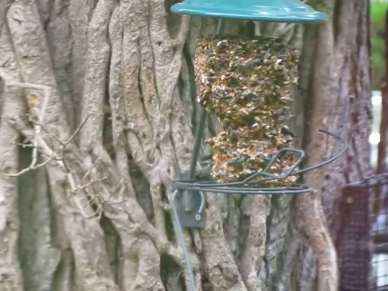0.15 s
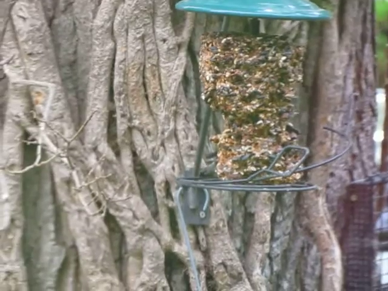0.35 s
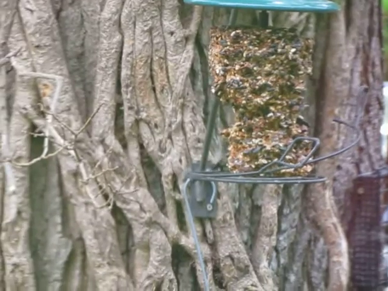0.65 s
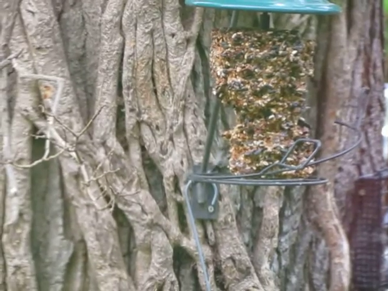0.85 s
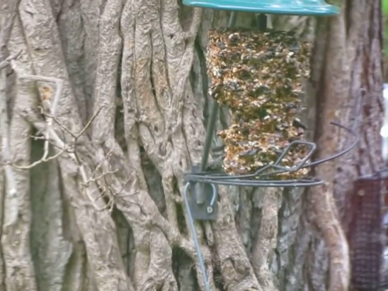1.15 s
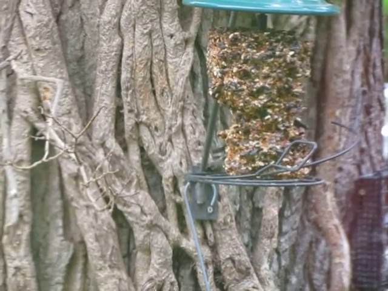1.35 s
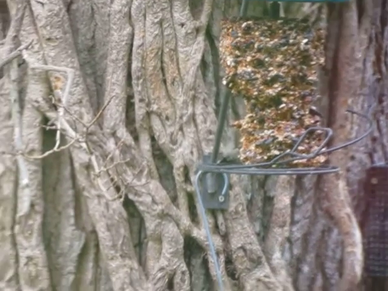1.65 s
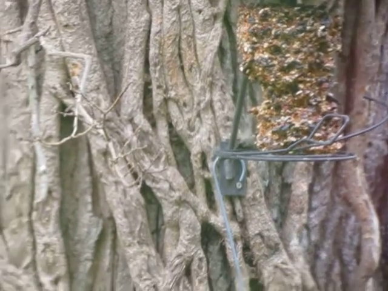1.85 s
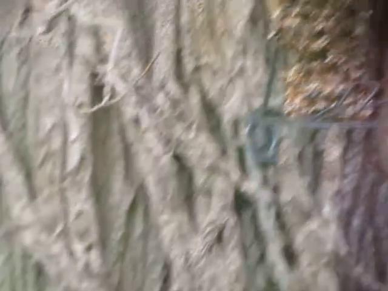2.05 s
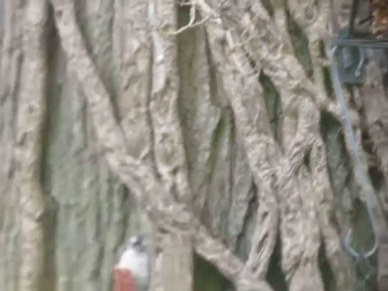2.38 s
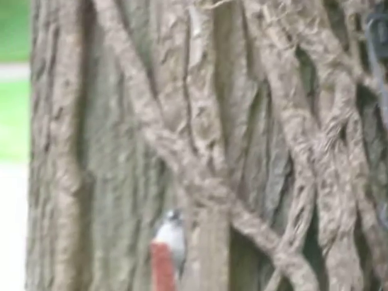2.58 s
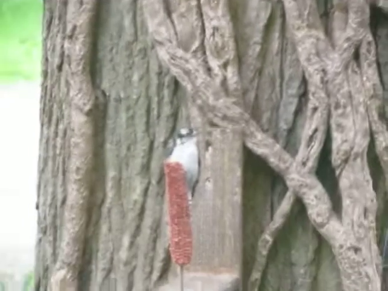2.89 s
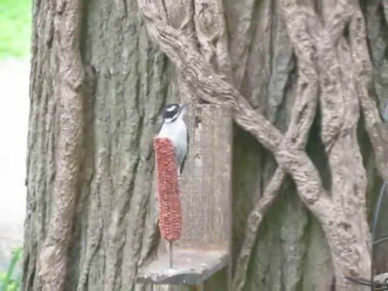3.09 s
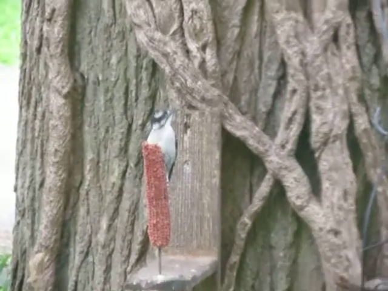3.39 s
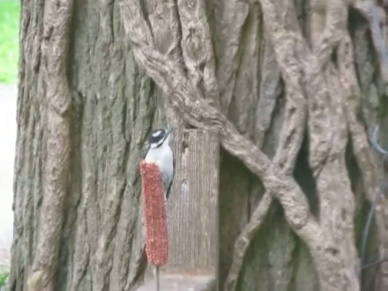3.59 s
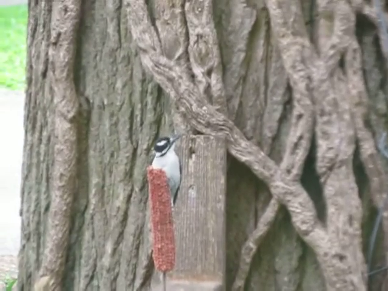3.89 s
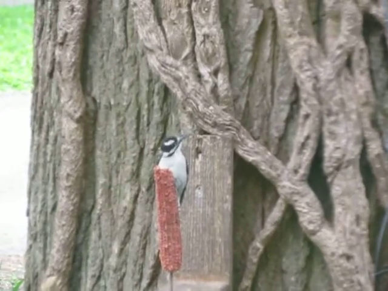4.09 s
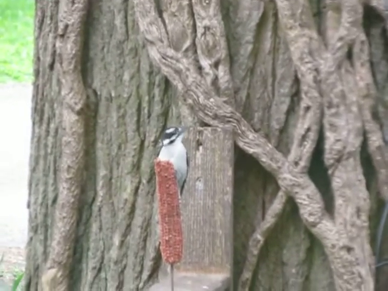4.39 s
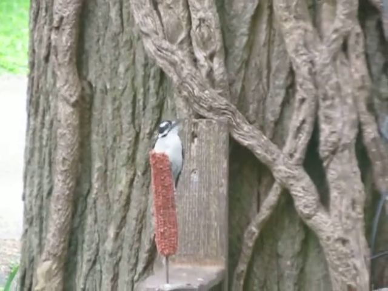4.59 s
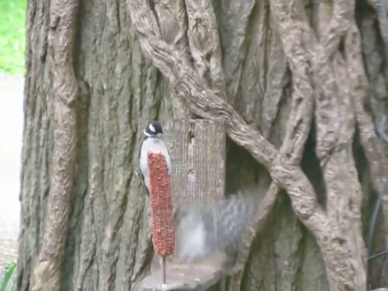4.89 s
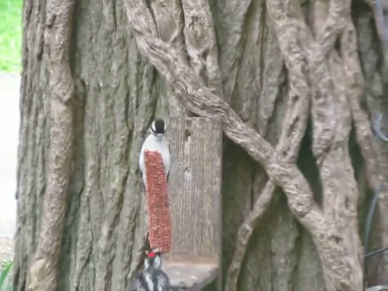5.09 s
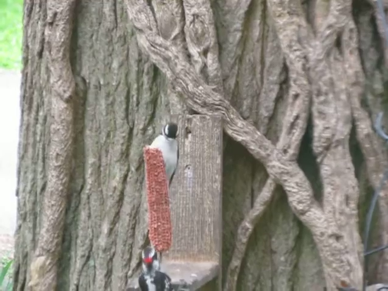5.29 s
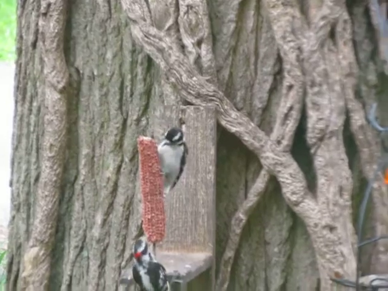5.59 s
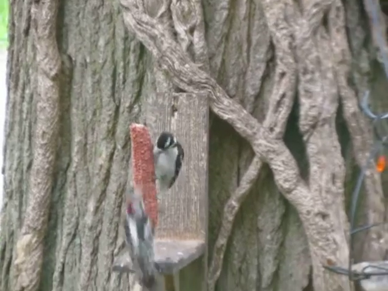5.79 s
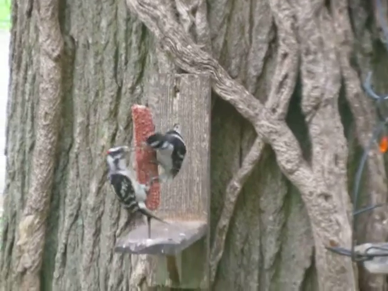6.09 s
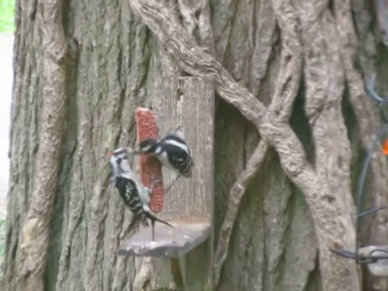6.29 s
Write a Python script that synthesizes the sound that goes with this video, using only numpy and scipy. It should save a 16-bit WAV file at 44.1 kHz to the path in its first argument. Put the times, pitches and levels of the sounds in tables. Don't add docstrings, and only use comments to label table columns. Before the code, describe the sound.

In a backyard beside a tree, small running water hisses and patters over a constant deep hum and soft rumble. Drops pop and plink at irregular moments, some low and glugging, others tiny and crisp. A woodpecker calls sharply three times after an initial dying echo, each clear whistle rising quickly, holding, then stopping abruptly into a short diffuse tail. Wide stereo pickup, with soft extreme treble.

```python
import sys
import numpy as np
from scipy import signal
from scipy.fft import rfft, irfft
from scipy.io import wavfile
from scipy.ndimage import uniform_filter1d, map_coordinates

SR = 44100
rng = np.random.default_rng(int(sys.argv[2]) if len(sys.argv) > 2 else 0)


def volts(x):
    e = np.asarray(x, float) / 20
    return 10 ** e


def store_wav(level_fs):
    pcm = np.round(np.clip(np.atleast_2d(level_fs), -1, 1) * 32767)
    wavfile.write(sys.argv[1], SR, pcm.T.astype(np.int16))


N = 284445


def unit(x):
    return x / np.sqrt(np.mean(x ** 2) + 1e-20)


def along(points, hz):
    f, v = np.transpose(points)
    return np.interp(np.log(hz + 1), np.log(f + 1), v)


def wobble(rate):
    knots = rng.standard_normal(int(N * rate / SR) + 4)
    return map_coordinates(knots, [np.arange(N) * rate / SR])


def pan(left_over_right_db):
    return volts([[left_over_right_db / 2], [-left_over_right_db / 2]])


# frequency in Hz, time to fall by 60 dB in seconds.
ECHO_TIMES = [(500, 0.099), (2000, 0.43), (4300, 0.51), (6000, 0.32), (8500, 0.33), (13000, 0.16)]


def echoes(x, build, far_db=-60):
    far_longer = 1.65
    hz, t, z = signal.stft(rng.standard_normal((2, SR * 3 // 4)), SR, nperseg=1024)
    even = z / np.abs(z)
    fade_db = -60 * t / along(ECHO_TIMES, hz)[:, None]
    fade = np.hypot(volts(fade_db), volts(far_db + fade_db / far_longer))
    tail = signal.istft(even * fade, SR, nperseg=1024)[1]
    tail = tail * (1 - np.exp(-np.arange(tail.shape[1]) / SR / build))
    return signal.oaconvolve(np.atleast_2d(x), tail / np.linalg.norm(tail[0]), axes=1)


# delay in seconds, level in dB.
WALL_ECHOES = [(.011, -6), (.025, -7), (.055, -6), (.076, -5)]


def in_yard(parts, wet_db):
    direct = sum(parts)
    walls = np.zeros_like(direct)
    for delay, db in WALL_ECHOES:
        for side, stretch in enumerate((1, 1.04)):
            walls[side] += volts(db) * np.roll(direct[side], round(delay * SR * stretch))
    tail = sum(echoes(part, build=0.00077)[:, :N] for part in parts)
    return direct + walls + volts(wet_db) * tail


# multiple of the mains frequency, rms level in dB.
PUMP_TONES = [(1, -33.5), (2, -62), (3, -54.5), (4, -53.5), (5, -57.5), (6, -74.5), (7, -63.5), (8, -59.5),
              (9, -62), (10, -59), (11, -85), (12, -111), (13, -66.5), (14, -84), (18, -67), (20, -68),
              (30, -89), (32, -62.5), (33, -68), (34, -63), (35, -82), (39, -64.5), (41, -68)]


def pump():
    mains_hz = 60.02
    t = np.arange(N) / SR
    hum = np.zeros(N)
    for k, db in PUMP_TONES:
        shake = .012 if k < 2 else .2
        start = rng.uniform(0, 2 * np.pi) if k > 1 else 4.0
        strength = np.sqrt(2) * volts(db) * (1 + shake * wobble(9))
        hum += strength * np.sin(2 * np.pi * round(k) * mains_hz * t + start + shake * wobble(9))
    return hum * pan(1.1)


# frequency in Hz, likeness from -1 to 1.
SIDES_ALIKE = [(60, 0.37), (150, 0.71), (380, 0.78), (950, 0.7), (2380, 0.29), (5980, 0.16), (15000, -0.7)]


def rush(spectrum, patchy_db):
    z = signal.stft(rng.standard_normal((2, N)), nperseg=512)[2]
    field = uniform_filter1d(rng.standard_normal(z.shape[1:]), size=8, axis=0)
    field = uniform_filter1d(field, size=7, axis=1)
    pair = signal.istft(z * volts(patchy_db * unit(field)), nperseg=512)[1][:, :N]
    hz = np.fft.rfftfreq(N, 1 / SR)
    turn = np.arccos(np.clip(along(SIDES_ALIKE, hz), -1, 1)) / 2
    shaped = rfft(pair) * volts(along(spectrum, hz))
    mid, side = irfft(shaped * [np.cos(turn), np.sin(turn)], N)
    return unit(np.array([mid + side, mid - side]))


# time in seconds, flow in dB.
WATER_FLOW = [(0.0, -53), (0.2, -51.5), (1.76, -52), (2.12, -51), (2.91, -52), (3.03, -52.5), (3.56, -52.5),
              (4.08, -51), (5.06, -53), (5.64, -51), (6.09, -54), (6.45, -51.5)]
# frequency in Hz, level in dB per Hz.
RUMBLE_COLOUR = [(15, -43), (25, -18), (70, -15.5), (91, -15), (114, -15), (240, -15.5), (346, -19),
                 (604, -19), (670, -22.5), (1600, -30.5), (2080, -44), (3520, -120)]
GURGLE_COLOUR = [(1100, -18.5), (1500, -19), (1850, -8.5), (2020, 3.5), (2200, -8), (2430, 0), (2700, -6),
                 (3200, -18.5)]
TRICKLE_COLOUR = [(2300, 2), (3000, -1.5), (3700, 0.5), (5000, -0.5), (6100, 0), (7200, -0.5), (8500, -6.5),
                  (10000, -57)]
SPRAY_COLOUR = [(6500, -19), (8500, 1), (11000, 0), (13000, -3), (15000, -23), (16000, -18)]


def water():
    s, db = np.transpose(WATER_FLOW)
    flow_db = np.interp(np.arange(N) / SR, s, db)
    surge_db = flow_db - flow_db.mean()
    gurgle_db = -51.5 + .3 * surge_db + 1.3 * wobble(4.63) + 0.62 * wobble(12)
    gurgle = volts(gurgle_db) * rush(GURGLE_COLOUR, patchy_db=4.0)
    trickle_db = -47 + surge_db + 0.09 * wobble(17)
    trickle = volts(trickle_db) * rush(TRICKLE_COLOUR, patchy_db=3.0)
    spray_db = -53.5 + 1.6 * surge_db + 0.32 * wobble(6.2)
    spray = volts(spray_db) * rush(SPRAY_COLOUR, patchy_db=2.3)
    rumble = volts(-49.0) * rush(RUMBLE_COLOUR + [(2400, -71)], patchy_db=-0.5) * pan(.9)
    return gurgle + trickle + spray + rumble


# start in seconds, length to the final push in seconds,
# held level in dB, top pitch in Hz, rise in Hz.
CALLS = [
    (-.25, 0.21, -30, 4334, 515),
    (1.907, 0.18, -28.5, 4396, 744),
    (3.909, 0.21, -27, 4330, 599),
    (5.531, 0.212, -28, 4355, 569),
]
# multiple of the pitch, level in dB against the whistle.
WHISTLE_OVERTONES = [(2, -22.5), (3, -23)]


def woodpecker():
    glide_hz_per_s, rise_shape, sag_hz_per_s = 10200, 1.4, 130
    attack_db, attack_s = -26, .018
    push_db, push_s = 4, 0.028
    release_db_per_s, release_s = 424, 0.031
    opens_db_per_khz = 12
    out = np.zeros((2, N + 3 * SR))
    for start, length, held_db, top_hz, rise_hz in CALLS:
        t = np.arange(0, length + release_s, 1 / SR)
        climb = np.exp(-(t * glide_hz_per_s / rise_hz) ** rise_shape)
        pitch = top_hz - rise_hz * climb - sag_hz_per_s * t
        effort_db = held_db + attack_db * np.exp(-(t / attack_s) ** 2)
        effort_db += push_db * np.exp(-((t - length) / push_s) ** 2)
        effort_db -= release_db_per_s * np.maximum(t - length, 0)
        flutter = (.004 * wobble(220) + .005 * wobble(45))[:len(t)]
        phase = 2 * np.pi * np.cumsum(pitch * (1 + flutter)) / SR
        breath = 1 + .12 * wobble(700)[:len(t)]
        voice = np.sin(phase)
        closed_db = opens_db_per_khz * (top_hz - pitch) / 1000
        for k, under_db in WHISTLE_OVERTONES:
            voice += volts(under_db - closed_db / (k - 1) ** 2) * np.sin(k * phase)
        voice = np.sqrt(2) * volts(effort_db) * breath * voice
        heard = echoes(voice, build=0.011, far_db=-17.5)
        heard[:, :len(t)] += volts(-5) * voice
        out[:, round((start + 1) * SR):][:, :heard.shape[1]] += heard
    return out[:, SR:SR + N] * pan(2.6)


def ringing(rows, cycles):
    return [(*row, cycles) for row in rows]


def drops(rows, wet_db):
    parts = np.zeros((3, 2, N + SR))
    t = np.arange(SR // 6) / SR
    for k, (s, db, hz, pan_db, cycles) in enumerate(rows):
        life = max(cycles, 4) / hz
        tone = np.sin(2 * np.pi * hz * t * (1 + 0.018 * t / life))
        ring = volts(db - 60 * t / life) * tone * (1 - np.exp(-t * hz / 0.99))
        parts[k % 3][:, round(s * SR):][:, :len(t)] += ring * pan(pan_db)
    return in_yard(parts[..., :N], wet_db)


# time in seconds, peak level in dB, pitch in Hz, left over right in dB.
LARGE_DROPS = [(0.1116, -29, 2080, 0), (0.7372, -33, 2020, 4), (1.0874, -34, 2100, -4),
               (1.6836, -35, 2020, -1), (1.7559, -30.5, 2480, -1), (2.7516, -35, 2030, 2),
               (2.8434, -28.5, 1730, 0), (2.9183, -32, 1660, 2), (3.0036, -33, 2060, -6),
               (3.0674, -33, 2010, -2), (3.4351, -38, 2530, -2), (3.6681, -36, 1930, -1),
               (4.2687, -36, 1930, 0), (4.4009, -38, 1880, -5), (4.6144, -30, 1900, 0),
               (4.8618, -30, 2340, -2), (4.9686, -38, 1960, 0.5), (5.3692, -35, 2420, 8),
               (5.41, -32, 1980, 2)]
DEEP_DROPS = [
    (0.03, -34.5, 664, 0.3),
    (1.006, -36, 670, 1),
    (3.924, -42, 686, 1.5),
    (5.713, -30.5, 672, 2),
    (5.718, -34, 850, 2),
]
HOLLOW_DROPS = [
    (2.4, -46, 930, 0),
    (2.78, -49, 927, 0),
    (2.8, -50, 790, 0),
    (2.9, -49, 925, 0),
]


def large_drops():
    rows = ringing(LARGE_DROPS, 38) + ringing(DEEP_DROPS, 26) + ringing(HOLLOW_DROPS, 150)
    return drops(rows, wet_db=5.0)


def droplets(count):
    draw = rng.random((count, 4))
    size_db = -46 + 9 * draw[:, 1] ** 2
    hz = 3300 * 4.5 ** draw[:, 2]
    pan_db = 8 * (draw[:, 3] - .4)
    return list(zip(draw[:, 0] * N / SR, size_db, hz, pan_db, np.full(count, 18)))


# time in seconds, peak level in dB, pitch
# in Hz, left over right in dB.
SMALLER_DROPS = [(0.9787, -28, 3430, 1), (1.045, -30, 3900, 2), (1.5255, -31.5, 3670, 0),
                 (1.55, -32, 2780, -1), (2.4009, -33, 3440, 2), (3.093, -29, 3600, 4),
                 (3.27, -33, 3740, 1.5), (3.8113, -29, 3490, 2), (5.3174, -33, 3040, 1),
                 (5.7926, -32, 3370, 3), (6.3066, -30.5, 3130, 2),
                 (0.099, -23.5, 8000, -4), (0.128, -30, 6230, 5), (0.5254, -23, 6650, 2),
               (0.639, -24.5, 5930, 0), (0.8077, -30.5, 6160, 4), (1.0325, -28, 5940, 2),
               (1.076, -30, 7060, 2.5), (1.9305, -30, 6230, 1.5), (1.954, -27, 5170, 0),
               (2.1884, -24.5, 6000, 1), (2.4197, -34, 5100, 3), (2.511, -28.5, 6430, 8),
               (2.8799, -29.5, 4800, 5), (3.057, -30, 4960, 5), (3.4126, -33, 5540, 7),
               (4.307, -27, 6330, 0), (4.687, -31.5, 5700, 2), (4.996, -29, 6400, 2.5),
               (5.0795, -25.5, 5570, 6), (5.2564, -33, 6300, 2.5), (5.937, -30, 6240, 3),
               (6.0454, -30.5, 6400, 6), (6.196, -31, 6600, -2)]


def small_drops():
    rows = ringing(SMALLER_DROPS, 28) + droplets(count=400)
    return drops(rows, wet_db=1.5)


# time in seconds, peak level in dB, left over right in dB.
SPRAY_BURSTS = [(0.099, -34, -1.5), (0.279, -33, 0), (0.31, -43, 2), (0.5263, -32, -4), (0.6194, -36, 0.0),
                (1.4012, -35, 3), (1.6694, -50, -1.5), (2.4366, -34, -2.0), (3.1094, -35, 3),
                (4.7591, -34, 1), (4.783, -43, 1), (5.467, -39, 0), (4.8794, -40, -1.5), (5.255, -35, 2),
                (6.3724, -32.5, -1.0)]


def splashes():
    parts = np.zeros((2, 2, N + SR))
    t = np.arange(SR // 20) / SR
    bright = signal.butter(2, (8000, 14500), "band", fs=SR, output="sos")
    draw = rng.random((150, 3))
    crackle = [(u * N / SR, -55 + 9 * v ** 2, 6 * (w - .5)) for u, v, w in draw]
    for k, (s, db, pan_db) in enumerate(SPRAY_BURSTS + crackle):
        hiss = signal.sosfilt(bright, rng.standard_normal((2, len(t))))
        burst = volts(db - 3.5 - 60 * t / 0.031) * (1 - np.exp(-t / .002)) * hiss
        parts[k % 2][:, round(s * SR):][:, :len(t)] += burst * pan(pan_db)
    return in_yard(parts[..., :N], wet_db=9)


def scene():
    return pump() + water() + woodpecker() + large_drops() + small_drops() + splashes()


def roll_off(x):
    return signal.sosfilt(signal.butter(12, 15730, fs=SR, output="sos"), x)


def record(dry):
    hz = np.fft.rfftfreq(N, 1 / SR)
    loudness = uniform_filter1d(np.mean(dry ** 2, axis=0), size=2500)

    def starved(from_level_db):
        return np.clip((loudness / volts(from_level_db) ** 2 - 1) * 3, 0, 1)

    top = starved(-27) * irfft(rfft(dry) * np.clip((hz - 13400) / 1200, 0, 1), N)
    over = starved(-24.5) * irfft(rfft(dry) * (hz > 4700) * (hz < 5200), N)
    return roll_off(dry - top - over)


dry = scene()
out = record(dry)
store_wav(out)
```